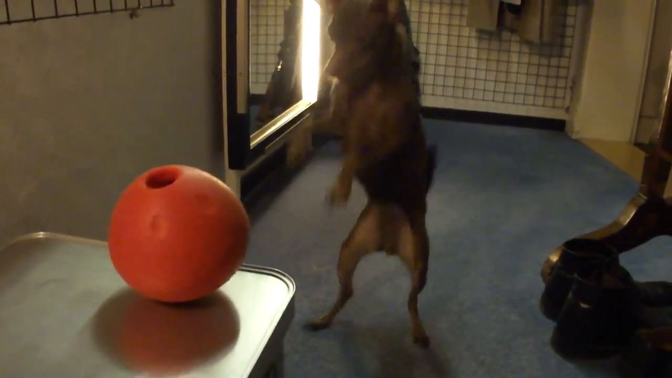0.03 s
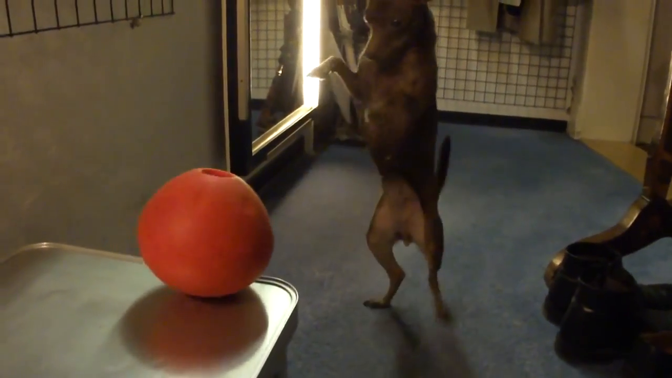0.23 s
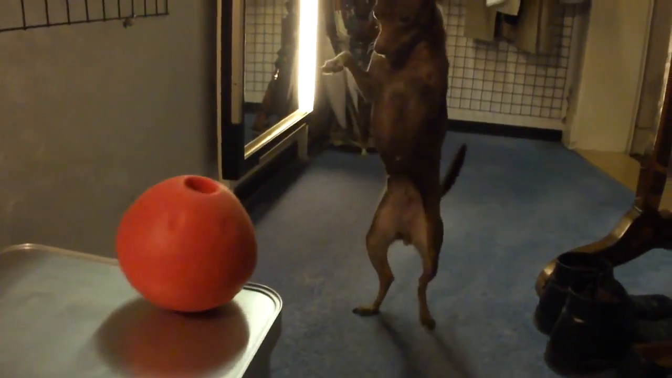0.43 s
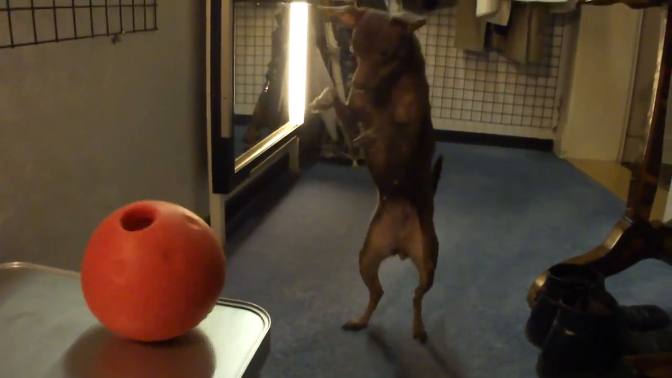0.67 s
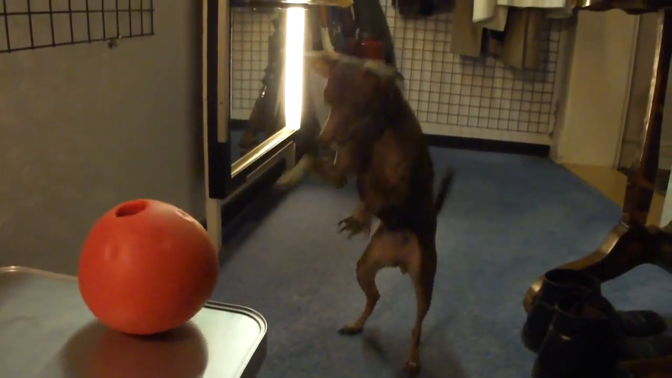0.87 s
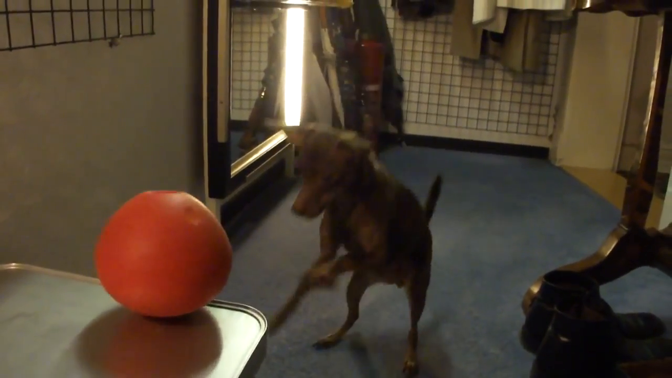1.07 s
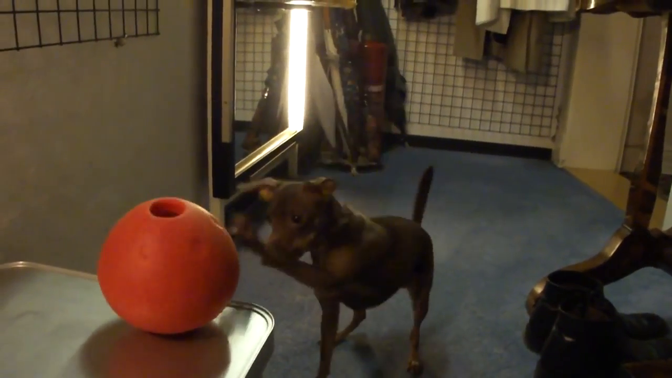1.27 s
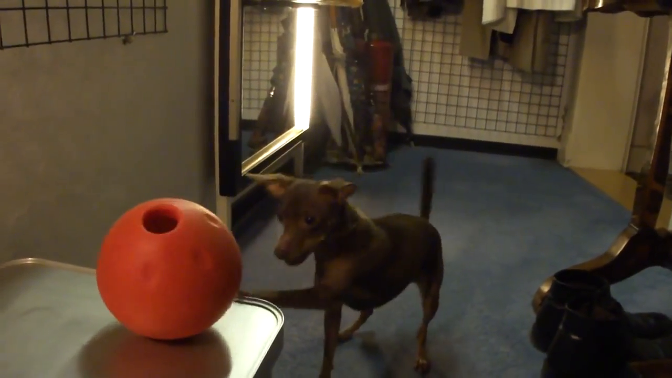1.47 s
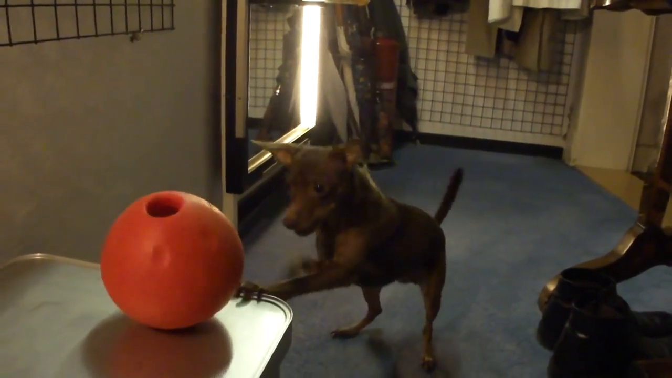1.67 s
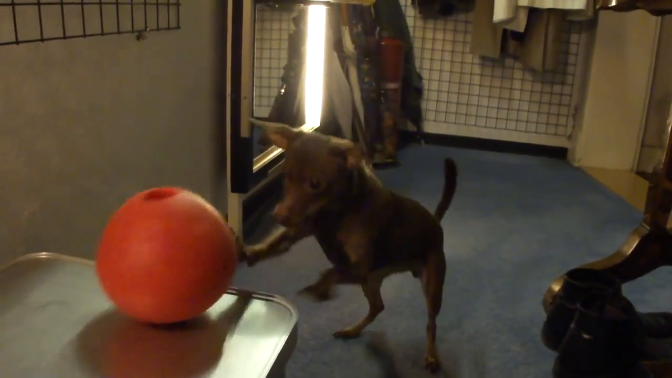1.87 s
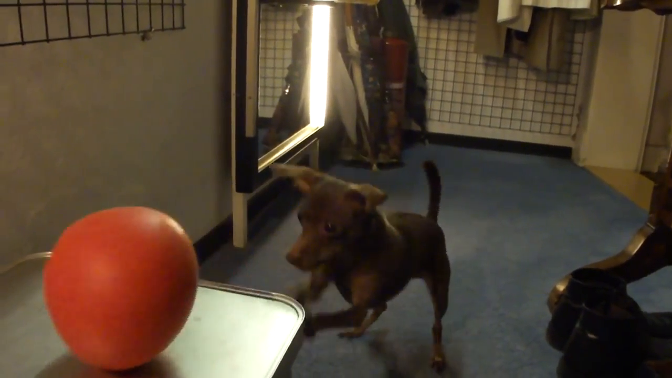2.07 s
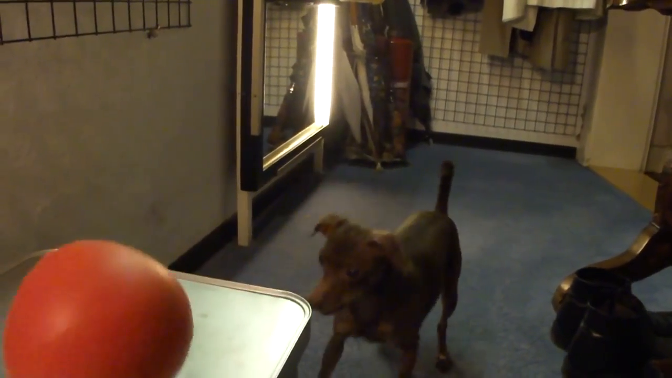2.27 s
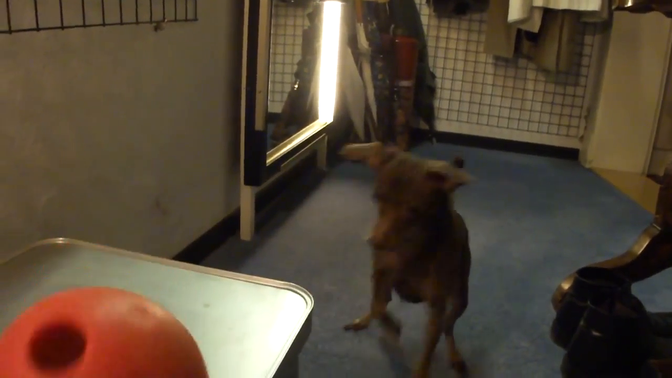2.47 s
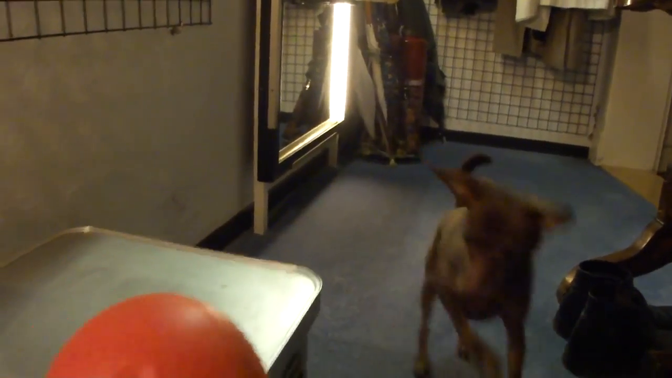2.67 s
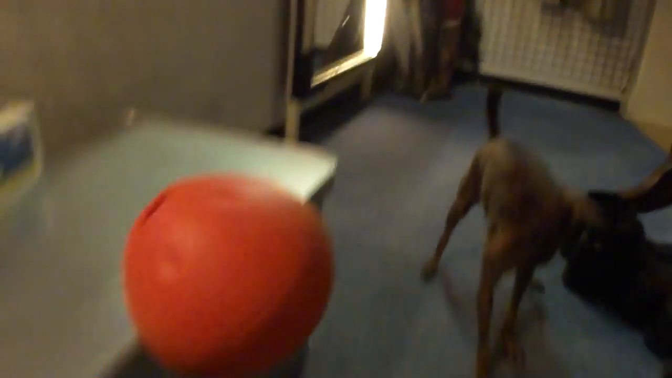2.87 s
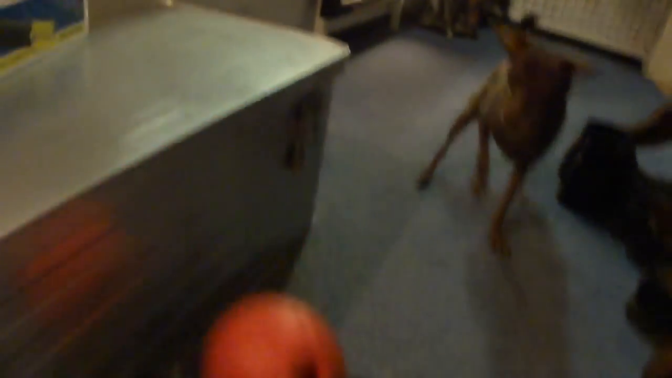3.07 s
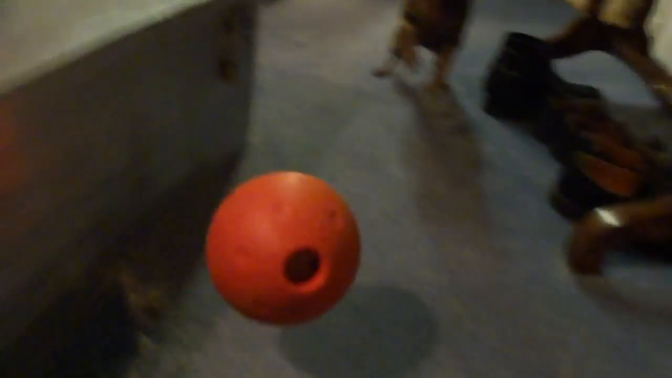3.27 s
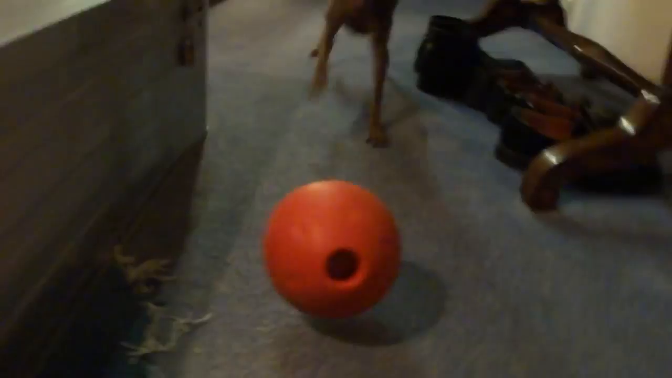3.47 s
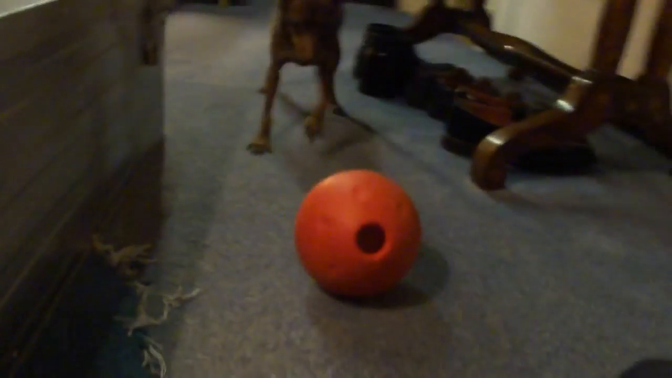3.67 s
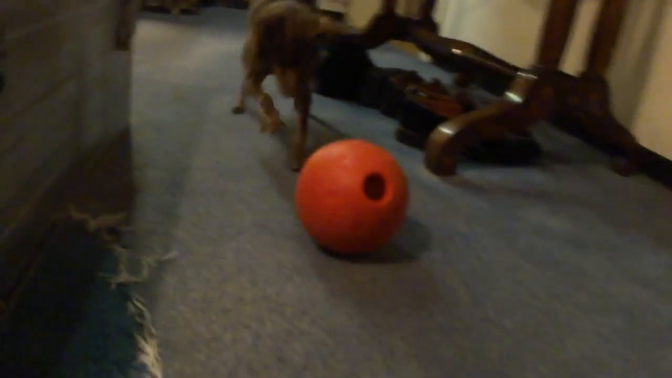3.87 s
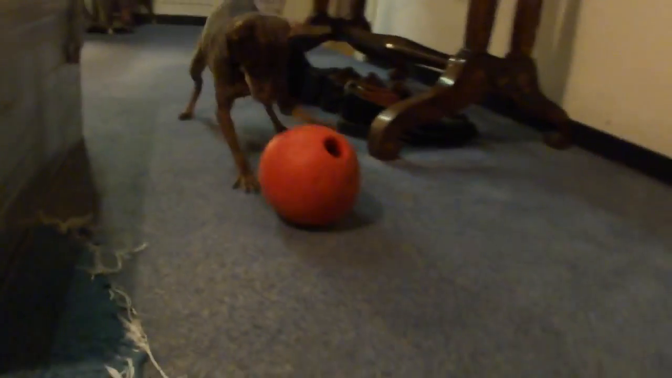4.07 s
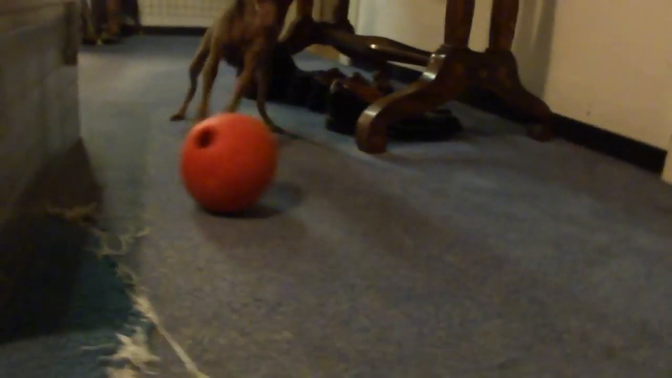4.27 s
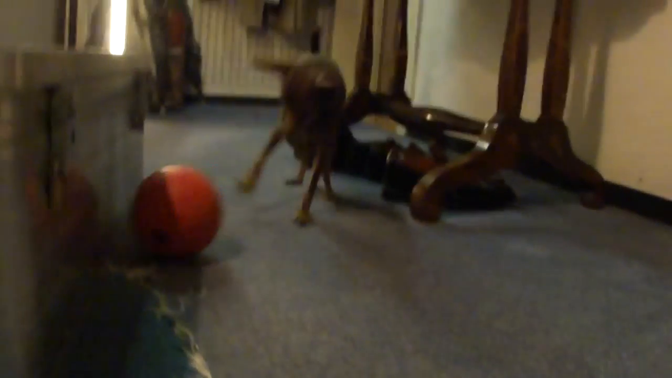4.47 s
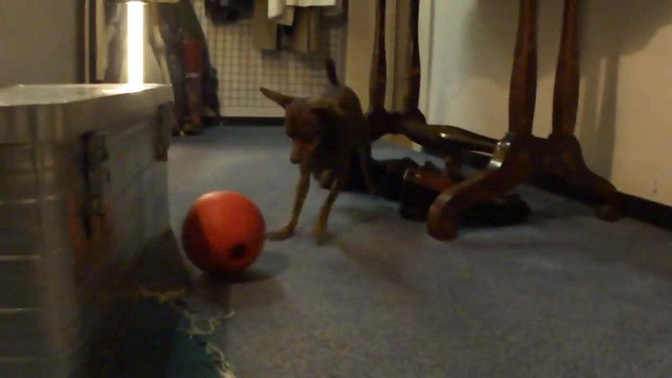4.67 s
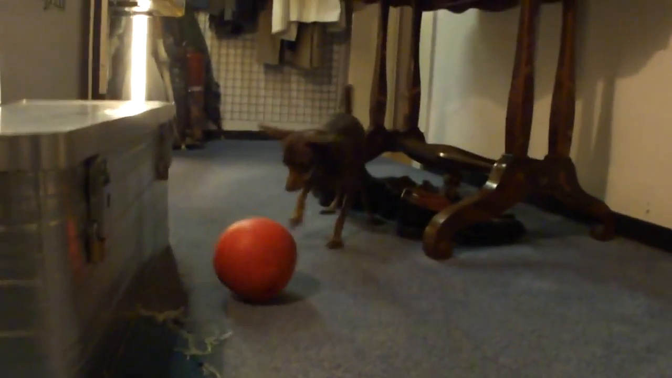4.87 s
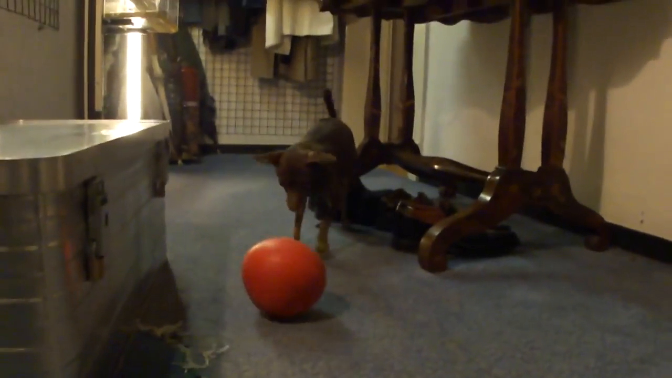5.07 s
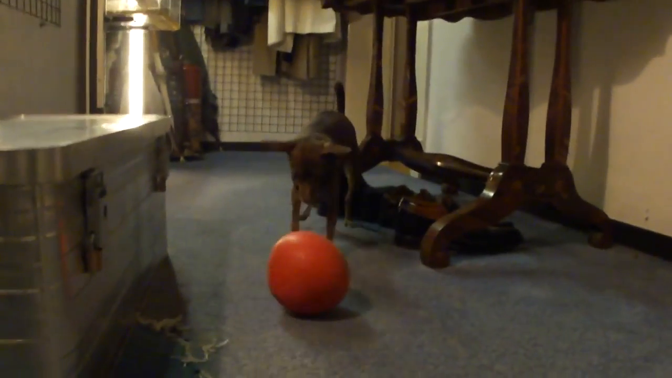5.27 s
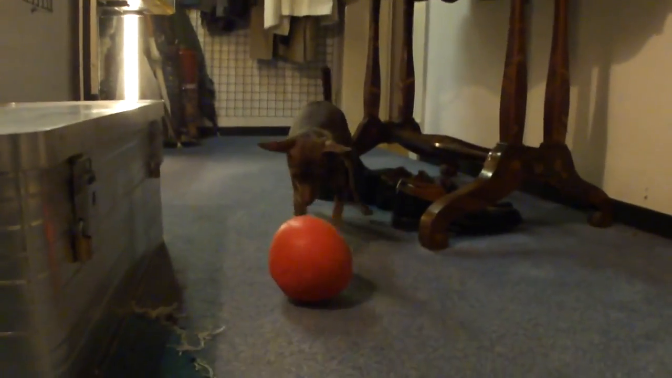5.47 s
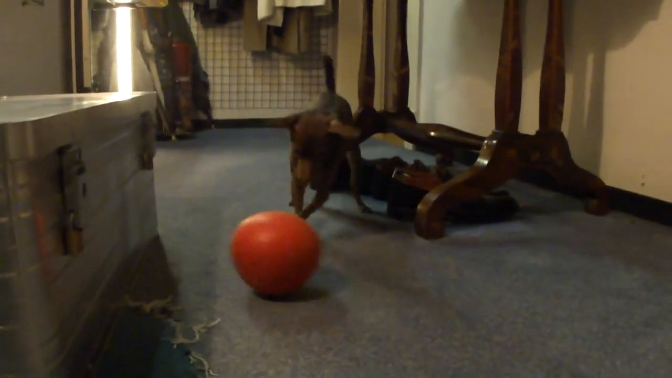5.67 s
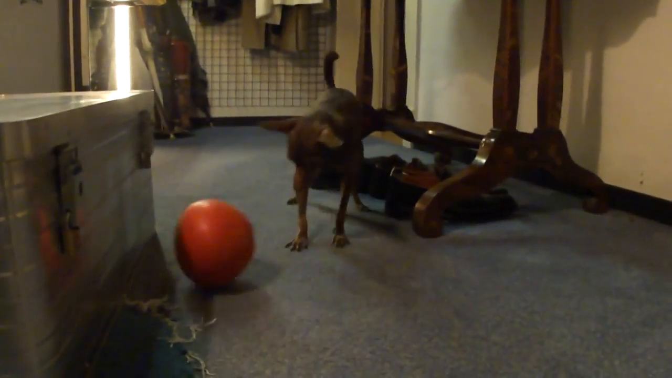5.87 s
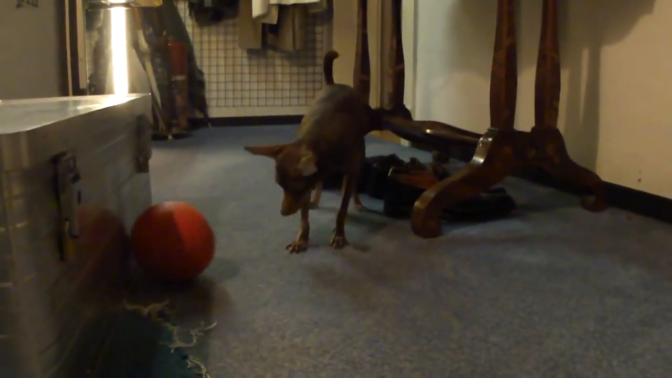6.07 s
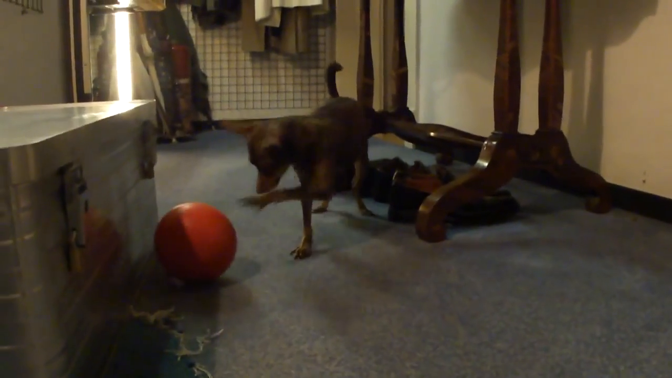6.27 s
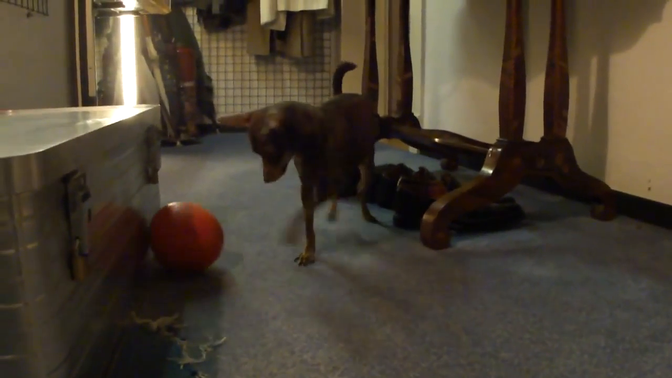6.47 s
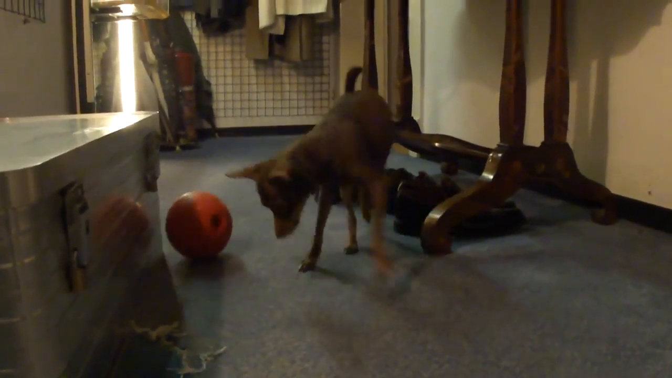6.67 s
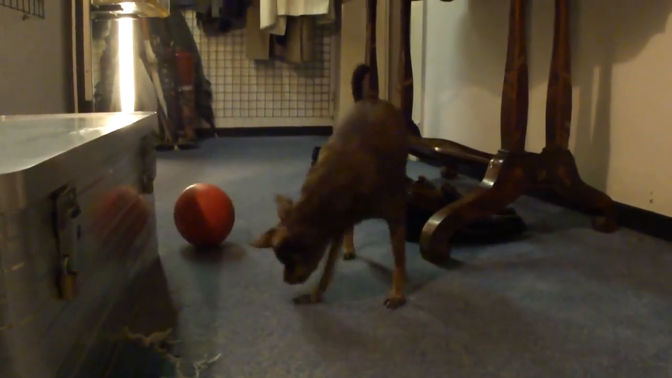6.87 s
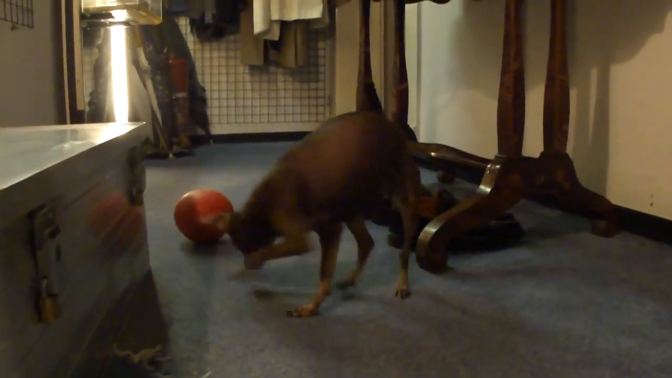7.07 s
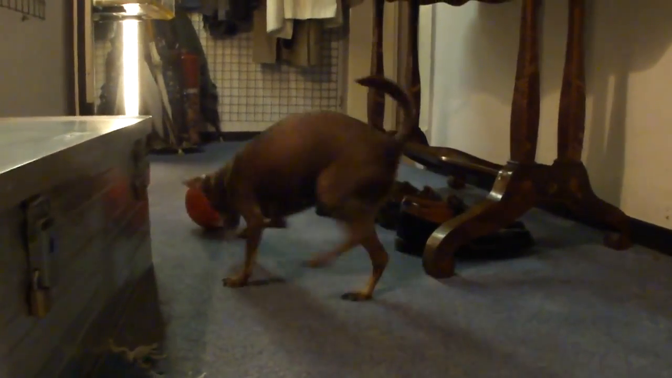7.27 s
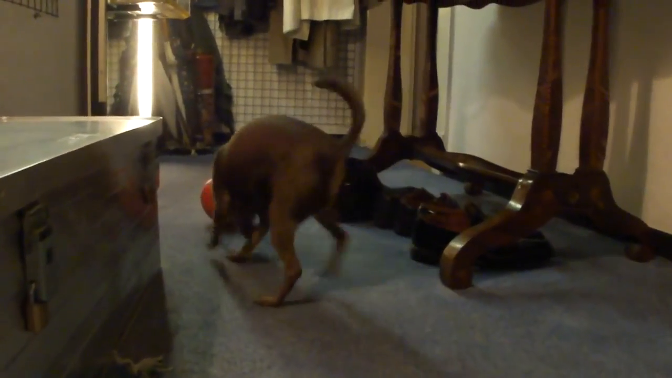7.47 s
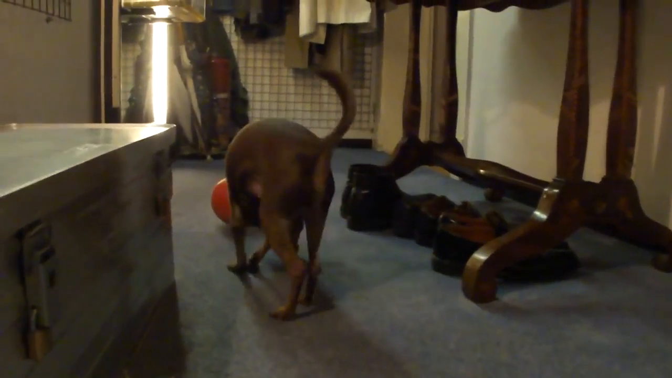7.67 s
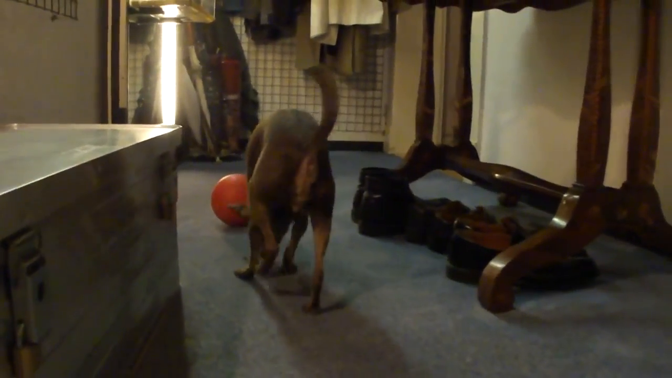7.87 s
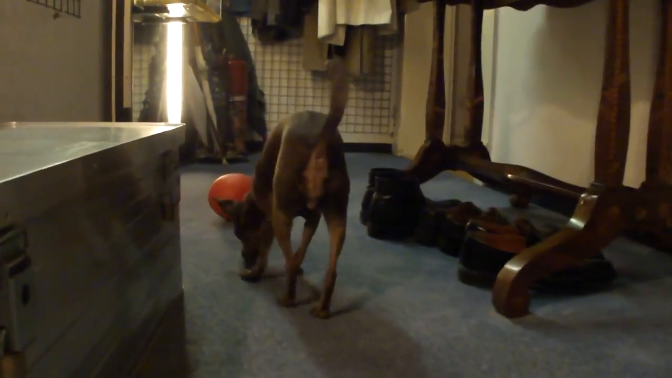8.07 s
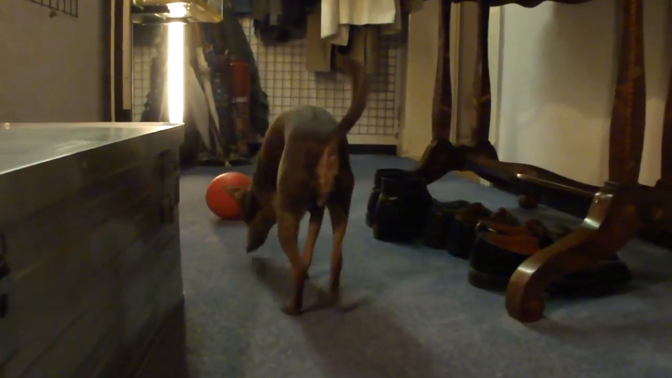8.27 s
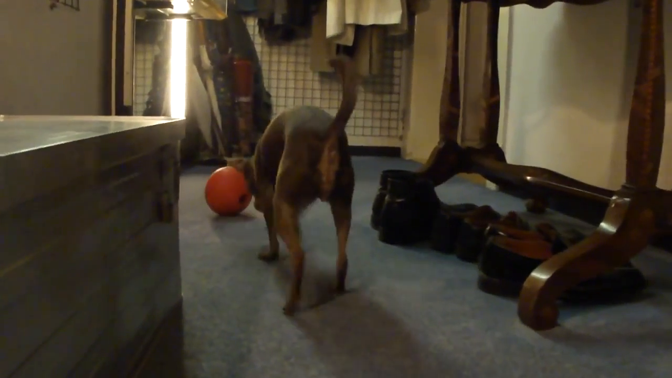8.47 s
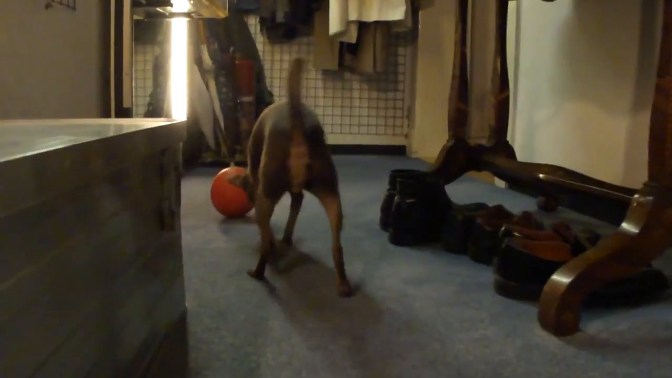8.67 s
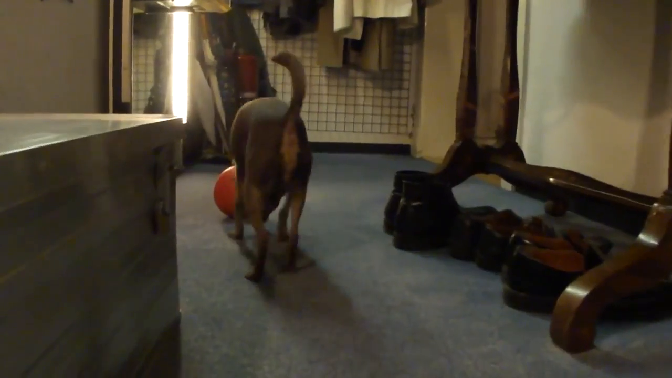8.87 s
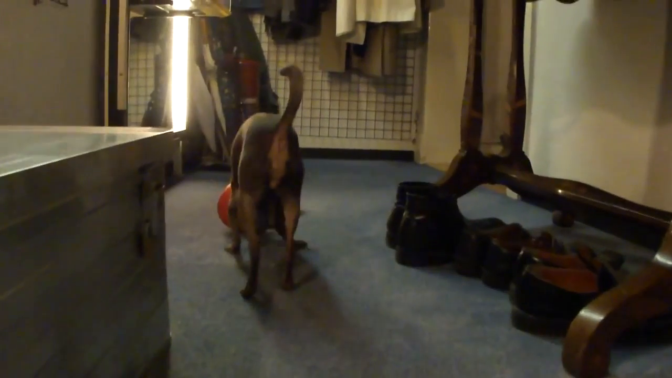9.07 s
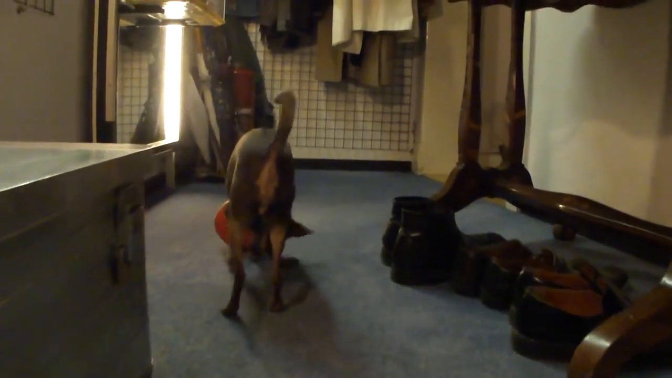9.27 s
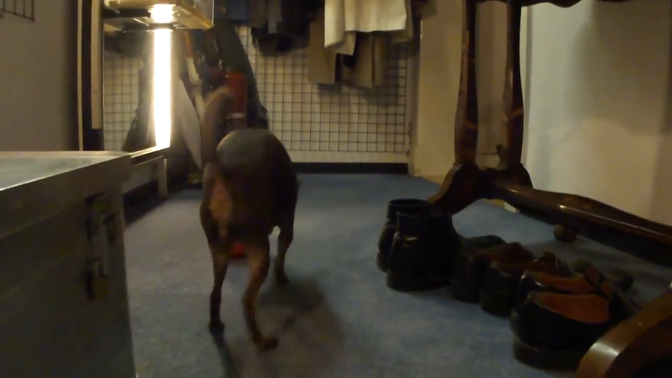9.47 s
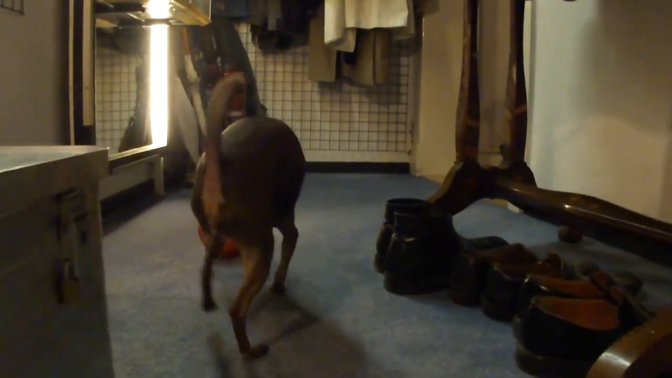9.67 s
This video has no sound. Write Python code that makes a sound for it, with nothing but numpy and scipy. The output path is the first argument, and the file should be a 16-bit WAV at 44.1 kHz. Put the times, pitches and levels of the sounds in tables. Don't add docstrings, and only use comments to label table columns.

```python
import sys
import numpy as np
from scipy import signal
from scipy.fft import rfft, irfft, next_fast_len
from scipy.io import wavfile
from scipy.ndimage import map_coordinates

SR = 44100
rng = np.random.default_rng(int(sys.argv[2]) if len(sys.argv) > 2 else 0)


def to_wav(sig):
    pcm = np.clip(np.atleast_2d(sig), -1, 1) * 32767
    pcm = np.round(pcm).astype(np.int16)
    wavfile.write(sys.argv[1], SR, pcm.T)


def elevation(decibels):
    levels = np.asarray(decibels, float)
    return 10 ** (levels / 20)


N = 429093

# (frequency [Hz], level [dB])
HARD_SURFACES = [(250, -15), (2400, -2), (3300, -9.5), (4500, -15), (5600, 0), (6800, 4), (9000, -1),
                 (10800, -9.5), (11600, -24), (13800, -50), (14400, -19), (15600, -14), (15900, -33),
                 (16900, -60)]


def unit(x):
    return x / np.sqrt(np.mean(x ** 2) + 1e-20)


def along(points, hz):
    f, v = np.transpose(points)
    return np.interp(np.log(hz + 1), np.log(f + 1), v)


def curves(rows):
    s, *cols = np.transpose(rows)
    return np.array([np.interp(np.arange(N) / SR, s, c) for c in cols])


def wobble(rate):
    knots = rng.standard_normal(int(N * rate / SR) + 4)
    return map_coordinates(knots, [np.arange(N) * rate / SR])


def shaped(x, response):
    m = next_fast_len(N + 8192)
    return irfft(rfft(x, m) * response(np.fft.rfftfreq(m, 1 / SR)), m)[..., :N]


def filtered(x, response):
    m = next_fast_len(N + SR // 2)
    gain = response(np.fft.rfftfreq(m, 1 / SR))
    gain = gain / np.sqrt(np.mean(abs(gain) ** 2))
    return irfft(rfft(x, m) * gain, m)[..., :N]


def body(modes, low_hz, high_hz):
    def response(f):
        ring = 0
        for k, (centre, width, db) in enumerate(modes):
            resonance = 1j * f * width / (centre ** 2 - f ** 2 + 1j * f * width)
            ring = ring + (-1) ** k * elevation(db) * resonance
        low_edge = (1j * f / low_hz / (1 + 1j * f / low_hz)) ** 2
        return ring * low_edge / (1 + 1j * f / high_hz) ** 2
    return response


def voiced(force):
    # (frequency [Hz], width [Hz], level [dB])
    case_modes = [(189, 119, -6.5), (289, 116, 0.5), (361, 110, 2.5), (565, 190, -1)]
    shell_modes = [(617, 305, 0), (1012, 225, 3.5), (1320, 300, 0), (1690, 250, 3), (2050, 650, 1),
                   (2377, 645, -6)]
    thud = filtered(force[0], body(case_modes, low_hz=121, high_hz=940))
    shell = filtered(force[1], body(shell_modes, low_hz=410, high_hz=3280))
    click = filtered(force[2], lambda hz: elevation(along(HARD_SURFACES, hz)))
    return thud + shell + click


def boards(force):
    # (frequency [Hz], width [Hz], level [dB])
    board_modes = [(114.6, 86, -2.5), (172, 84, 0.5)]
    return filtered(force, body(board_modes, low_hz=70, high_hz=200))


def clatter(grain_db, rate, count=3):
    shared = wobble(rate)
    noises = []
    for _ in range(count):
        grain = elevation(grain_db * (shared + 0.61 * wobble(rate)))
        noises.append(unit(grain * rng.standard_normal(N)))
    return np.array(noises)


def bursts(t60s, blow, tail):
    t = np.arange(SR // 4) / SR
    scatter = elevation(-60 * t / np.clip(t60s, 0.01, 0.4)[:, None])
    chatter = 1.8 * elevation(-60 * t / 0.011)
    force = tail * rng.standard_normal((len(t60s), len(t))) * (scatter + chatter)
    force[:, 0] = blow
    return force


def knocks(rows, width, blow, db):
    out = np.zeros(N + SR)
    forces = bursts(np.array(rows)[:, 3], blow, tail=0.7)
    for (s, peak_db, hz, t60), force in zip(rows, forces):
        edges = hz * np.array([1 - width / 2, 1 + width / 2])
        band = signal.butter(3, edges, "bandpass", fs=SR, output="sos")
        spot = signal.sosfilt(band, force)
        out[round(s * SR):][:len(spot)] += elevation(peak_db + db) * spot / abs(spot).max()
    return out[:N]


def jolts(rows, shell_db=-np.inf, hard_db=-np.inf, delay=0):
    force = np.zeros((3, N + SR))
    for s, peak_db, *_ in rows:
        force[1:, round(s * SR) + delay] += elevation([peak_db + shell_db, peak_db + hard_db])
    return force[:, :N]


def thuds():
    # (time [s], peak [dB], ringing [Hz], t60 [s])
    on_lid = [(0.334, -29, 434, 0.2), (0.443, -30, 365, 0.17), (1.115, -29, 586, 0.33),
              (1.218, -26.5, 470, 0.24), (1.418, -34, 285, 0.13), (1.52, -19, 530, 0.12),
              (1.913, -26, 527, 0.14), (1.998, -30.5, 565, 0.41), (2.043, -21, 523, 0.16),
              (2.148, -16.5, 736, 0.14), (2.271, -30, 530, 0.22), (2.358, -24, 490, 0.23),
              (2.7, -32.5, 318, 0.23), (2.831, -27, 494, 0.15)]
    # (time [s], peak
    # [dB], ringing [Hz], t60 [s])
    on_floor = [(3.191, -0.5, 590, 0.12), (3.468, -5, 326, 0.077), (3.615, -14.5, 333, 0.23),
                (3.699, -23, 320, 0.14), (4.168, -24, 523, 0.22), (4.567, -33, 401, 0.19),
                (4.601, -3.5, 420, 0.15), (4.647, -11.5, 392, 0.21), (4.891, -24, 467, 0.24),
                (5.456, -21.5, 730, 0.12), (5.651, -30, 337, 0.12), (5.747, -30.5, 447, 0.15),
                (6.152, -5, 450, 0.06), (6.293, -21, 476, 0.1), (6.401, -19, 410, 0.21),
                (6.575, -8, 420, 0.18), (6.8, -27.5, 410, 0.086), (7.402, -36, 360, 0.17),
                (9.384, -22, 530, 0.25), (9.656, -34, 376, 0.23)]
    # (time [s], peak [dB])
    nips = [
        (4.103, -11),
        (5.306, -26),
        (5.743, -34),
    ]
    nip_hz, nip_t60 = 915, 0.029
    delay = 60
    heavy = on_lid + on_floor
    force = jolts(heavy, shell_db=0, delay=delay) + jolts(nips, shell_db=10, hard_db=-17)
    rows = heavy + [(*row, nip_hz, nip_t60) for row in nips]
    return force, np.roll(knocks(rows, width=0.85, blow=14.8, db=-0.5), delay)


def hollow_ball():
    # (time [s], peak [dB], ringing [Hz])
    struck = [(0.22, -32, 860), (0.773, -37, 676), (1.422, -29.5, 1320), (1.905, -23.5, 1230),
              (2.153, -19.5, 724), (2.275, -28, 920), (2.884, -45, 832), (3.195, -2, 715), (3.232, -9, 736),
              (3.469, -8.5, 720), (3.611, -24, 1040), (4.601, -9.5, 806), (4.619, -6, 940),
              (5.654, -32, 840), (6.154, -11, 798), (6.176, -12, 953), (6.404, -24.5, 1070),
              (6.575, -14, 700), (6.594, -10, 1170)]
    # (time [s], peak [dB], cavity [Hz])
    tumbles = [(5.027, -28.5, 1070), (5.128, -29.5, 1010), (5.225, -39, 1027), (5.275, -37, 976),
               (5.324, -27.5, 930), (5.377, -29, 1020), (5.549, -36.5, 1055), (7.275, -39, 1040),
               (7.323, -32, 980), (7.374, -35, 1025), (7.84, -27, 980), (8.047, -48, 1030),
               (8.392, -34, 1083), (8.502, -23.5, 980)]
    struck_t60, tumble_t60 = 0.11, 0.25
    ring = knocks([(*row, struck_t60) for row in struck], width=0.17, blow=26, db=-5.5)
    ring += knocks([(*row, tumble_t60) for row in tumbles], width=0.11, blow=32, db=-3.5)
    return jolts(struck, shell_db=10, hard_db=-17), ring


def rim_and_claws():
    # (time [s], peak [dB], ringing [Hz], t60 [s])
    bouncing = [(3.1922, -23, 1670, 0.16), (3.3259, -14.5, 1780, 0.15), (3.471, -6, 1650, 0.082),
                (3.5199, -18.5, 2260, 0.058), (3.6182, -28, 1720, 0.14), (3.6449, -16, 1850, 0.087),
                (3.7267, -28, 2050, 0.25), (3.7856, -20.5, 1690, 0.13), (4.1026, -21, 1870, 0.28),
                (4.1692, -14, 1780, 0.093), (4.6046, -7, 1520, 0.28), (4.705, -17, 1300, 0.08),
                (4.807, -22.5, 1460, 0.21), (4.8938, -27, 1470, 0.17), (5.0258, -32, 1580, 0.1),
                (5.3054, -29.5, 1580, 0.23), (5.441, -35, 1800, 0.05), (5.458, -19, 1770, 0.22),
                (5.652, -24, 1950, 0.15)]
    nosed = [(6.0227, -35.5, 1900, 0.1), (6.0406, -29.5, 1820, 0.13), (6.083, -37, 1850, 0.15),
             (6.2562, -22.5, 1520, 0.15), (6.2855, -26, 1500, 0.14), (6.403, -25, 1900, 0.25),
             (6.575, -17, 1400, 0.21), (6.7015, -32, 1410, 0.16), (6.765, -28.5, 1660, 0.28),
             (6.8015, -27.5, 1800, 0.2), (6.8416, -27, 2240, 0.57), (6.875, -29, 1900, 0.6),
             (7.3212, -27.5, 1810, 0.29), (7.404, -33, 2050, 0.6), (7.7603, -30.5, 1980, 0.6),
             (7.8944, -27, 1630, 0.25), (7.9698, -30.5, 1760, 0.44), (8.4812, -27, 1850, 0.43)]
    claws = [(1.4228, -35.5, 1580, 0.24), (1.6796, -37.5, 2050, 0.16), (1.732, -42, 2010, 0.16),
             (1.909, -24.5, 1690, 0.14), (1.9974, -27.5, 1920, 0.48), (2.0204, -25, 1600, 0.22),
             (2.04, -16, 1550, 0.15), (2.1485, -23.5, 1780, 0.18), (2.2012, -27.5, 1990, 0.23),
             (2.2893, -36, 1610, 0.13), (2.317, -26, 1890, 0.15), (2.373, -30, 1770, 0.16),
             (2.406, -36.5, 1610, 0.12), (2.4343, -38.5, 1860, 0.072), (2.4668, -27, 2070, 0.053),
             (2.5435, -23.5, 1860, 0.041), (2.6252, -19, 1780, 0.07), (2.6647, -28.5, 1910, 0.27),
             (2.7103, -24, 1920, 0.11), (2.833, -26.5, 1830, 0.48), (2.948, -38, 1530, 0.13)]
    rim = bouncing + nosed
    force = jolts(rim, shell_db=10, hard_db=-17) + jolts(claws, hard_db=-29)
    ring = knocks(rim, width=0.4, blow=19.8, db=0.5) + knocks(claws, width=0.38, blow=23.4, db=5)
    return force, ring


def treat_clicks():
    # (time [s], peak [dB], t60 [s])
    clicks = [(1.5251, -22, 0.21), (1.93, -27.5, 0.16), (2.0194, -28, 0.08), (2.039, -8, 0.06),
              (2.135, -20, 0.14), (2.149, -12.5, 0.087), (2.191, -23.5, 0.11), (2.7086, -40, 0.13),
              (2.833, -38.5, 0.23), (3.202, -19, 0.12), (3.25, -17.5, 0.092), (3.478, -12, 0.048),
              (3.52, -18.5, 0.073), (3.61, -26, 0.072), (3.6436, -20.5, 0.12), (3.815, -38.5, 0.36),
              (4.1026, -30.5, 0.25), (4.169, -34, 0.1), (4.6044, -12, 0.21), (4.6191, -9.5, 0.24),
              (4.6826, -23.5, 0.056), (4.7062, -18, 0.065), (4.8094, -27, 0.13), (6.1617, -29, 0.087),
              (6.1762, -12.5, 0.11), (6.2834, -28.5, 0.11), (6.578, -23, 0.085), (6.5943, -14.5, 0.15),
              (8.3325, -44.5, 0.02), (8.5015, -31, 0.15)]
    push = np.zeros((3, N + SR))
    for (s, peak_db, t60), force in zip(clicks, bursts(np.array(clicks)[:, 2], blow=4, tail=0.5)):
        push[2, round(s * SR):][:len(force)] += elevation(peak_db - 10) * force
    return push[:, :N]


def thrown_treats():
    # (time [s], peak [dB], thud [dB], click [dB], t60 [s])
    throws = [(0.0, -40, 4, 4.5, 0.21), (1.522, -27.5, -28, -20.5, 0.92), (1.903, -28.5, -3.5, -18.5, 1),
              (2.035, -20, -1, 0, 0.19), (2.149, -28, -1.5, -1, 0.26), (2.7, -35, -2, -30, 1),
              (3.2, -5.5, -9.5, -20, 0.32), (3.465, -14, -10.5, -19.5, 0.36), (3.608, -17, -9, -18.5, 0.15),
              (4.164, -19.5, -11, -27, 0.25), (4.612, -6, -2, -18, 0.43), (5.74, -28, -18, -16.5, 0.22),
              (6.171, -11, -6, -19, 0.33), (6.589, -12, -5, -19, 0.35), (7.317, -29.5, -11.5, -23, 0.74),
              (7.762, -40, -6.5, -18, 0.98), (8.484, -29.5, -8.5, -22, 0.6), (9.39, -37.5, -9, -13, 1),
              (9.58, -50, -17, -0.5, 0.47)]
    flight_s = 0.029
    t = np.arange(SR) / SR
    push = np.zeros((3, N + SR))
    for s, db, thud_db, click_db, t60 in throws:
        shape = (1 - np.exp(-t / 0.0021)) * elevation(-60 * np.maximum(t - flight_s, 0) / t60)
        level = elevation([[db + thud_db - 10], [db - 14], [db + click_db - 9]])
        push[:, round(s * SR):][:, :len(t)] += level * shape
    return push[:, :N] * clatter(grain_db=2.5, rate=220)


def rings():
    # (time [s], peak [dB],
    # frequency [Hz], t60 [s])
    floor_and_lid_modes = [(3.193, -16.5, 210, 0.22), (3.193, -24, 318, .4), (3.193, -12, 646, 0.28),
                           (3.21, -13, 1114, 0.21), (3.215, -18, 748, 0.3), (3.21, -22, 980, 0.45),
                           (3.2, -22, 1830, .25), (3.47, -22, 213, .15), (3.474, -13.5, 285, 0.17),
                           (3.47, -16, 587, 0.19), (3.47, -18, 1000, 0.1), (1.521, -19, 520, .17)]
    wall_modes = [(4.602, -18, 172, 0.28), (4.61, -21, 317.6, .35), (4.605, -13, 394, .3),
                  (4.643, -11, 410, .22), (4.615, -22, 976, .16), (4.63, -17, 1316, .2),
                  (4.63, -19.5, 1459, 0.24), (4.61, -24, 1707, 0.17), (6.154, -26, 224.4, 0.35),
                  (6.155, -22.5, 366, 0.52), (6.16, -28, 532, .3), (6.2, -20, 560, .2),
                  (6.17, -22, 1320, .22), (6.17, -21, 1690, .15), (6.575, -26.5, 226, 0.42),
                  (6.576, -14, 400, .3), (6.585, -19, 445.3, 0.41), (6.59, -23.5, 534.4, 0.32),
                  (6.59, -24, 701, 0.28), (6.635, -28, 1015, 0.19), (6.6, -24, 1280, 0.29)]
    rise_s, wander = 0.0046, 0.9
    t = np.arange(SR // 2) / SR
    out = np.zeros(N + SR)
    for s, peak_db, hz, t60 in floor_and_lid_modes + wall_modes:
        drift = map_coordinates(rng.standard_normal(32), [t * 50], order=2)
        phase = 2 * np.pi * hz * t + wander * drift
        fade = elevation(peak_db - 60 * t / t60) * (1 - np.exp(-t / rise_s))
        out[round(s * SR):][:len(t)] += fade * np.sin(phase)
    return out[:N]


def booms():
    # (time [s], peak [dB])
    steps = [(0.33, -41), (0.442, -47), (1.114, -42), (1.214, -48), (2.268, -41.5), (2.357, -43),
             (3.465, -48), (4.165, -53), (4.602, -21.5), (6.15, -27), (6.572, -28), (7.171, -54.5)]
    push = np.zeros(N + SR)
    for (s, peak_db), force in zip(steps, bursts(np.full(len(steps), 0.55), blow=5.9, tail=0.85)):
        push[round(s * SR):][:len(force)] += elevation(peak_db - 2) * force
    return boards(push[:N])


def clinks():
    # (time [s], peak [dB], frequency [Hz], t60 [s])
    bands = [
        (8.501, -41, 5356, .2),
        (8.501, -34, 6961, .22),
        (8.501, -35, 9006, .25),
        (3.203, -24, 6900, .2),
        (5.653, -38, 1610, .24),
        (5.653, -36, 1880, .25),
        (5.653, -34, 2089, .13),
        (4.17, -23, 1884, .15),
    ]
    return knocks(bands, width=0.05, blow=12, db=0)


def small_contacts():
    # (time [s], peak [dB], ringing [Hz], t60 [s])
    ticks = [(0.0014, -29, 1600, 0.12), (0.2344, -48, 1080, 0.1), (1.702, -36, 1920, 0.1),
             (1.7594, -39, 1440, 0.1), (2.6843, -30, 1690, 0.065), (4.7718, -28, 1940, 0.1),
             (5.075, -40, 1630, 0.1), (6.5086, -37, 1690, 0.088), (6.7106, -29, 1330, 0.1),
             (6.8528, -31, 2070, 0.1), (6.8904, -30, 1730, 0.1), (7.439, -34, 1800, 0.1),
             (7.4724, -34, 2050, 0.13), (7.516, -32, 1870, 0.1), (3.078, -35, 2200, 0.05),
             (7.6854, -38, 1810, 0.1), (7.7423, -36, 1930, 0.1), (7.7907, -32, 1750, 0.1),
             (7.9393, -30, 1950, 0.11), (8.0459, -34, 1000, 0.1), (8.243, -43, 1280, 0.1)]
    bumps = [(0.001, -29, 530, 0.11), (0.234, -41, 850, 0.1), (2.799, -36, 450, 0.15),
             (2.882, -28, 832, 0.15), (4.806, -22, 460, 0.15), (4.958, -35.5, 1010, 0.15),
             (8.352, -38, 900, 0.15), (5.204, -36, 939, 0.13), (5.255, -27, 930, 0.15),
             (6.764, -36, 412, 0.15), (7.528, -36, 700, 0.15), (8.045, -35, 1100, 0.17)]
    # (time [s], peak [dB], ringing [Hz], t60
    # [s])
    blow_edges = [
        (3.453, -33, 1100, .06),
        (6.553, -38, 1800, .05),
        (3.1935, -9, 680, .03),
        (4.6025, -4, 700, .015),
        (6.1535, -5, 900, .012),
        (8.5, -39, 500, .25),
        (8.39, -37, 1300, .12),
        (1.54, -25, 520, .12),
        (9.385, -26, 560, .2),
    ]
    # (time [s], peak [dB], centre [Hz], t60 [s])
    flecks = [(.002, -32, 9000, 0.12), (.002, -45, 15100, .15), (.405, -60, 8900, .08),
              (1.526, -46, 15100, .2), (1.8, -54, 7500, .04), (1.93, -53, 15100, 0.28),
              (2.038, -26, 8600, .05), (2.038, -30, 15100, 0.23), (2.055, -22, 8000, .1),
              (2.149, -35, 15100, .2), (2.192, -30, 8500, .1), (2.317, -49, 6500, .04),
              (2.467, -50, 6000, .04), (2.665, -50, 6500, .04), (2.686, -48, 6500, .1),
              (2.71, -35, 6170, 0.16), (2.71, -43, 3600, 0.2), (2.833, -41, 6000, 0.16),
              (7.85, -56, 6800, .1), (7.887, -52, 8500, .03), (7.94, -56, 5800, .03), (8.0, -54, 7000, .03),
              (9.39, -50, 9100, 0.29)]
    low = knocks(ticks, width=0.47, blow=26, db=-2)
    low += knocks(bumps + blow_edges, width=0.57, blow=16, db=-1.5)
    high = knocks(flecks, width=0.35, blow=10, db=4.5)
    treble = lambda hz: elevation(np.minimum(along(HARD_SURFACES, np.maximum(hz, 10500)) + 18, 0))
    return low + shaped(high, treble)


def scrapes():
    # (time [s], length [s], level [dB])
    drags = [
        (1.108, 0.32, -41),
        (1.566, 0.32, -45),
    ]
    # (frequency [Hz], width [Hz], level [dB])
    sheet = [(610, 85, 8.5), (1420, 240, 2), (2050, 52, 8.5), (2260, 77, 6.5)]
    t = np.arange(N) / SR
    drag = np.zeros(N)
    for s, length, db in drags:
        stop = np.clip((s + length - t) / 0.13, 0, 1)
        drag += elevation(db - 9 * (t - s) / length) * (t > s) * stop
    slips = clatter(grain_db=5, rate=110, count=1)[0]
    return filtered(drag * slips, body(sheet, low_hz=300, high_hz=2970))


def rolling():
    # (time [s], shuffle [dB])
    steady = [
        (0.0, -51),
        (0.38, -68.5),
        (3.3, -53.5),
        (9.1, -63),
        (9.73, -51),
    ]
    # (time [s], length [s], shuffle [dB])
    slides = [(0.87, 0.096, -51), (7.8, .3, -54), (3.1, .11, -51), (6.76, 0.24, -51.5), (8.84, 0.14, -53),
              (3.668, 0.37, -49.5), (4.183, 0.29, -44)]
    quiet_db = -58
    # level at rest [dB], growth [dB per dB of stir]
    rest_db = np.array([[-60.5], [-55.5], [-66.5], [-76.5]])
    growth = np.array([[0.97], [1.25], [0.6], [0.53]])
    t = np.arange(N) / SR
    runs = np.zeros(N)
    for s, length, db in slides:
        ends = np.clip(np.minimum(t - s, s + length - t) / 0.076, 0, 1)
        runs += elevation(db - 5 * (t - s) / length) * ends
    stir = 20 * np.log10(elevation(curves(steady)) + runs) - quiet_db
    swell = 0.37 * wobble(21) + 1.87 * np.array([wobble(25) for _ in range(4)])
    force = elevation(rest_db + growth * stir + swell) * clatter(grain_db=1, rate=150, count=4)
    force[2] = shaped(force[2], lambda hz: elevation(-0.5 * np.log2((hz + 2000) / 9000)))
    return voiced(force) + boards(force[3])


def whistle(level, hz, wander, rate, width_hz, broken_db):
    phase = 2 * np.pi * np.cumsum(hz * (1 + wander * wobble(rate))) / SR
    loudness = elevation(curves(level)[0] + broken_db * wobble(25))
    return loudness * wobble(width_hz) * np.sin(phase)


def rolling_treat():
    # (time [s], level [dB])
    level = [(4.93, -110), (4.96, -52), (5.1, -56), (5.2, -51), (5.29, -55), (5.42, -58), (5.5, -62),
             (5.58, -54), (5.63, -110)]
    return whistle(level, hz=1000, wander=0.04, rate=14, width_hz=110, broken_db=5)


def dog():
    # (time [s], pitch [Hz], level [dB])
    grunt = [
        (9.382, 521, -23),
        (9.39, 468, -31),
        (9.415, 411, -20),
        (9.455, 404, -24),
        (9.465, 372, -37),
        (9.53, 382, -57),
    ]
    # (overtone [number], level [dB])
    throat = [(1, -1), (2, -13), (3, -18), (4, -29)]
    hz, db = curves(grunt)
    phase = 2 * np.pi * np.cumsum(hz * (1 + 0.05 * wobble(300))) / SR
    tone = np.zeros(N)
    for k, level in throat:
        rough = 1 + (0.2 + 0.25 * k) * wobble(220)
        tone += elevation(level) * rough * np.sin(k * phase)
    t = np.arange(N) / SR
    start = np.clip((t - grunt[0][0]) / 0.0046, 0, 1)
    stop = np.clip((grunt[-1][0] - t) / 0.0078, 0, 1)
    return elevation(db - 0.5) * start * stop * tone


def lens():
    # (time [s], level [dB])
    drive = [(0, -76), (.38, -76), (.45, -73), (.98, -76), (1.1, -77), (2.3, -75), (2.62, -72), (3.0, -78),
             (3.2, -95)]
    hiss = unit(shaped(rng.standard_normal(N), lambda hz: np.exp(-((hz - 15100) / 800) ** 2)))
    chirr = whistle(drive, hz=8870, wander=0.035, rate=22, width_hz=900, broken_db=5)
    return chirr + elevation(curves(drive)[0] - 5) * hiss


def hall(x, scale):
    # (frequency [Hz], t60 [s])
    decay = [(150, 0.15), (1000, 0.14), (8000, 0.024)]
    hz, t, z = signal.stft(rng.standard_normal(SR // 2), SR, nperseg=256)
    fade = elevation(-60 * t / (scale * along(decay, hz)[:, None]))
    tail = signal.istft(z * fade, SR, nperseg=256)[1]
    return signal.fftconvolve(x, tail / np.linalg.norm(tail))[:N]


def scattered(x):
    z = signal.stft(x, nperseg=256)[2]
    turned = z * np.exp(2j * np.pi * rng.random(z.shape))
    y = signal.istft(turned, nperseg=256)[1][:N]
    return y * np.std(x) / np.std(y)


def two_ports(mid):
    # (frequency [Hz], level [dB])
    ports = [(60, -31), (200, -42), (500, -23.5), (1200, -14.5), (2400, -12.5), (5000, -5.5), (9000, -2.5),
             (15000, -1.5)]
    # (frequency [Hz], share [ratio])
    left = [(300, .015), (2000, .025), (10000, 0.08)]
    side = shaped(scattered(mid), lambda hz: elevation(along(ports, hz)))
    side += shaped(mid, lambda hz: along(left, hz))
    return np.array([mid + side, mid - side])


def port_noise():
    # (frequency [Hz], density [dB per Hz])
    colour = [(24, -75), (40, -28), (184, -9), (458, -4), (1920, -10.5), (2900, -26.5), (3770, -49),
              (6380, -120)]
    noise = shaped(rng.standard_normal((2, N)), lambda hz: elevation(along(colour, hz)))
    return elevation(-53.5) * unit(noise)


def scene():
    force = treat_clicks() + thrown_treats()
    near = booms() + rings() + clinks() + small_contacts() + scrapes() + rolling_treat() + dog()
    for contact in (thuds, hollow_ball, rim_and_claws):
        push, ring = contact()
        force += push
        near += ring
    near += voiced(force)
    mid = near + elevation(-13) * hall(near, scale=2.34) + rolling() + lens()
    return two_ports(mid) + port_noise()


def band_limit(x):
    return signal.sosfilt(signal.butter(12, 16970, fs=SR, output="sos"), x)


def record(dry):
    # (frequency [Hz], width [Hz], depth [dB])
    notches = [(3000, 230, 30), (4010, 170, 30), (5000, 200, 30)]

    def microphone(hz):
        dips_db = sum(depth * np.exp(-((hz - c) / (w / 2)) ** 2) for c, w, depth in notches)
        return elevation(-dips_db) * (1j * hz / (68 + 1j * hz)) ** 3

    limited = dry / (1 + abs(dry / 3.9) ** 6) ** (1 / 6)
    return band_limit(shaped(limited, microphone))


dry = scene()
out = record(dry)
to_wav(out)
```